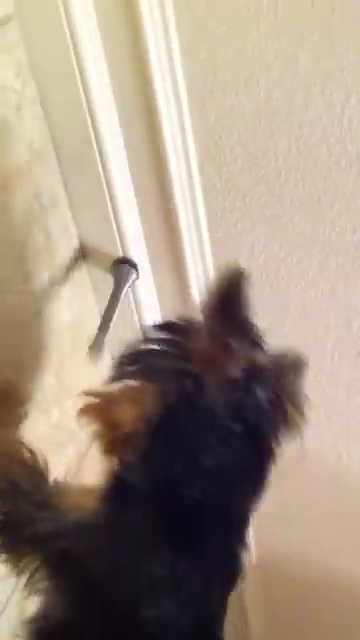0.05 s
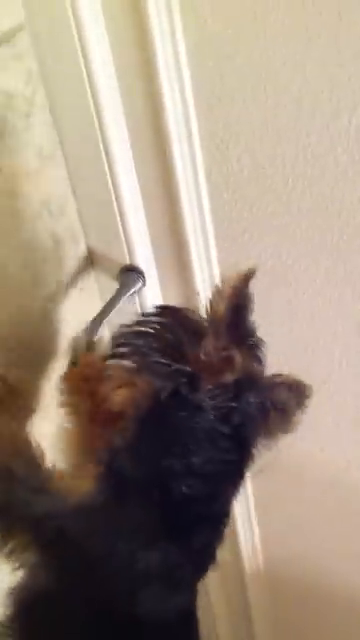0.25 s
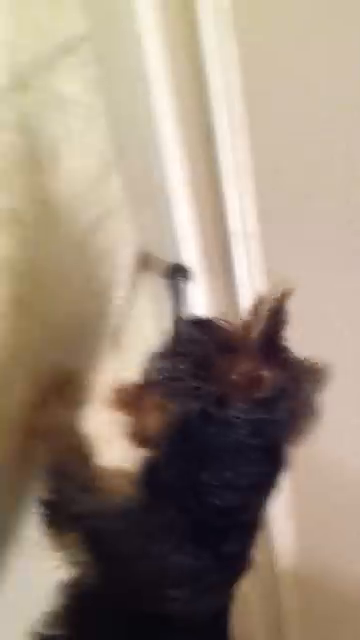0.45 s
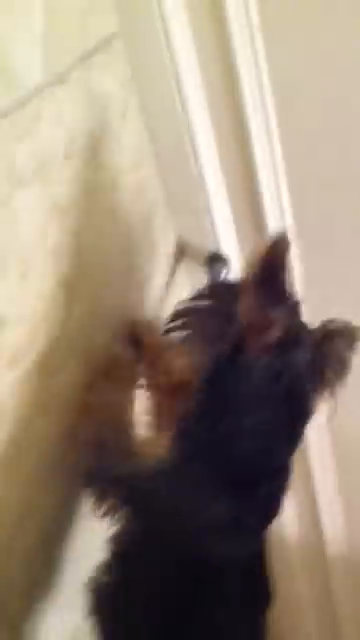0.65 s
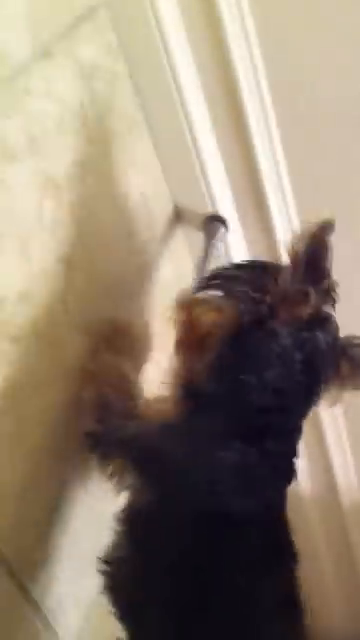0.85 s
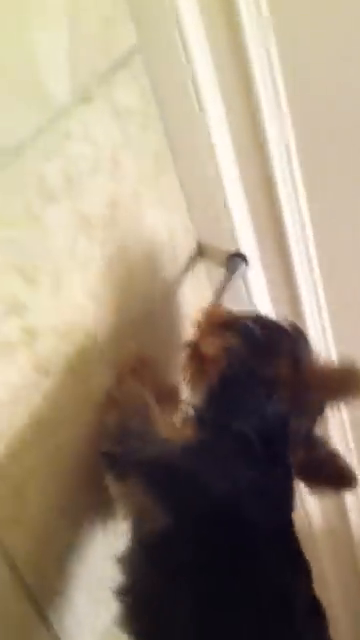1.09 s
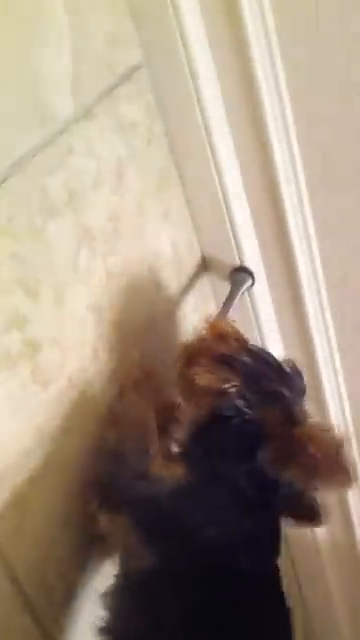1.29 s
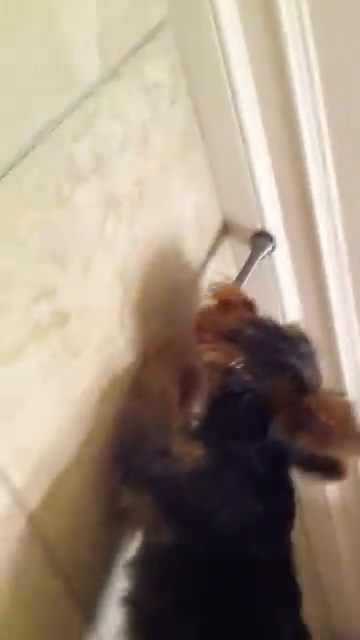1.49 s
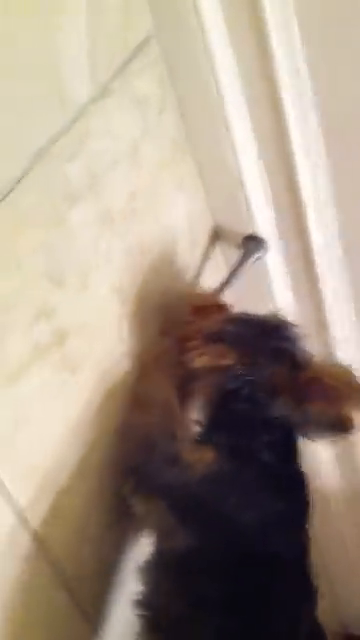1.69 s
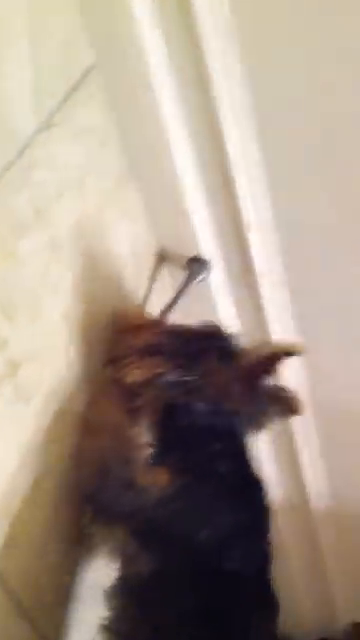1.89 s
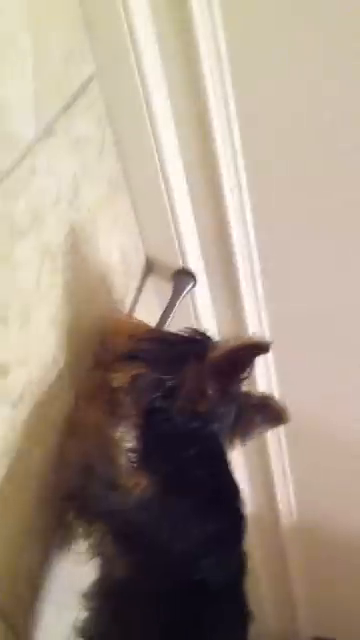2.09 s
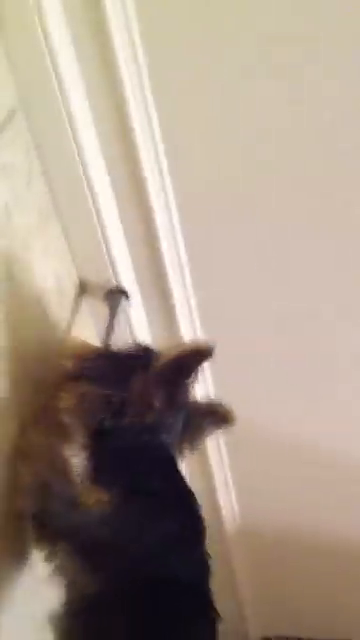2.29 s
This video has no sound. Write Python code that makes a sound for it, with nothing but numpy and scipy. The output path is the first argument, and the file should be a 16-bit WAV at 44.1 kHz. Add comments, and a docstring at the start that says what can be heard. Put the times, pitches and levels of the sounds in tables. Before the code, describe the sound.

Sharp, rattling knocks of a doorstop rod batted by a puppy, then faint taps on tile.

```python
"""A puppy knocks a metal rod doorstop about at the foot of a wall, in a small tiled room.
Each impact drives a damped thud from the baseboard and a brief clash from the loose rod;
reflections follow, and the wall and room ring on. Fur brushes the wall between the knocks
and as they die away. Last come a few soft, nearly dry taps close by, with tiny ticks and
a dull shuffle of paws, over a faint steady background noise."""
import sys
import numpy as np
from scipy import signal
from scipy.fft import rfft, irfft
from scipy.io import wavfile

SR = 44100
rng = np.random.default_rng(int(sys.argv[2]) if len(sys.argv) > 2 else 0)


def unload_wav(signal):
    """Save mono or channel-first audio to the path in sys.argv[1] as 16-bit WAV at rate SR, clipped to [-1, 1]."""
    wavfile.write(
        sys.argv[1],
        SR,
        np.round(np.clip(np.atleast_2d(signal).T, -1, 1) * 32767).astype(np.int16),
    )


N = 108045

# Knocks of the doorstop. Each row: start in seconds, relative thud level in dB, thud pitch in Hz,
# relative clash level in dB, clash tilt in dB per octave.
KNOCKS = [(.051, -45, 890, -33, -8.5), (.083, -63, 900, -29, -0.5), (0.103, -16.5, 920, -51, -3),
          (0.1172, -21.5, 640, -22, 1.5), (.153, -57, 900, -26.5, -2.5), (0.174, -50, 900, -36.5, 0),
          (0.216, -51, 1000, -27, -2), (0.2365, -4, 1296, -7, 1), (0.2702, -4, 1110, 0.5, 0.5),
          (0.2774, -2, 1040, -9.5, 6), (.4258, -17, 694, -8.5, 2), (.466, 0.5, 1100, -0.5, 1),
          (0.4887, -14, 930, -7, -3.5), (.7088, 0.5, 1364, -5, -1.5), (.947, -37, 870, -33, -8.5),
          (.956, -26, 880, -26.5, -6), (0.9613, -37, 794, -16.5, -3), (0.9889, -4.5, 925, -5, 2.5),
          (1.243, -34, 720, -23.5, -3), (1.2612, -26, 1100, -11, 1), (1.266, -16.5, 557, -50, -8),
          (1.337, -28.5, 395, -27.5, -4.5)]


def baseboard():
    """Heavily damped oscillation: a thud that dies in a cycle or so, and the wall's low push under it."""
    # Spectrum of the thud. Each row: frequency in Hz, gain in dB.
    thud_spectrum = [(40, -30), (120, -19), (250, 1), (500, -1.5), (1000, -1.5), (1600, 2), (2500, 3.5),
                     (5000, -21.5), (16000, -20)]
    decay_cycles, rise_s = 0.53, 0.00037
    push_db, push_peak_s = -26, 0.0019
    t = np.arange(4096) / SR
    thuds, pushes = np.zeros((2, N))
    for start, db, hz, _, _ in KNOCKS:
        envelope = np.exp(-t * hz / decay_cycles) * (1 - np.exp(-t / rise_s))
        add(thuds, start, amp(db) * unit(envelope * np.sin(2 * np.pi * hz * t)))
        push = np.gradient(swell(t, push_peak_s, sharp=4.9))
        add(pushes, start, amp(db + push_db) * unit(push))
    return colour(thuds, thud_spectrum), pushes


def rod():
    """Modal excitation: chatter in its seat rings the rod. Gives the direct clash and the room's share."""
    # Spectrum of the chatter. Each row: frequency in Hz, relative level in dB.
    clash_spectrum = [(100, -20.5), (700, 3.5), (2000, -2.5), (3500, 0), (5400, 1.5), (6600, -2.5),
                      (8600, -6.5), (12000, -6.5), (16000, -5)]
    # Modes of the rod. Each row: frequency in Hz, relative level in dB, 60 dB decay time in seconds.
    rod_modes = [(2800, 4, 0.043), (3515, -7.5, 0.053), (4260, 1.5, 0.016), (4835, -6, 0.022),
                 (5560, 5, 0.024), (6200, 1, 0.047), (7630, -1.5, 0.031), (9500, 0, .012),
                 (11900, 7, 0.0071), (15600, -8, 0.0078)]
    peak_s, grain_db = 0.0017, 2
    ring_db, vary_db, detune = -7.5, 0.5, 0.0275
    t = np.arange(4096) / SR
    clashes, pulses = np.zeros((2, N))
    for start, _, _, db, tilt_db in KNOCKS:
        contacts, sizes = rng.standard_normal((2, len(t)))
        force = contacts * amp(grain_db * sizes) * swell(t, peak_s, sharp=1.2)
        chatter = colour(force, clash_spectrum, tilt_db)
        # Each knock excites and loads the rod differently.
        modes = [(hz * (1 + detune * rng.normal()), mode_db + vary_db * rng.normal(), t60)
                 for hz, mode_db, t60 in rod_modes]
        ringing = through(chatter, ring(modes, size=len(t)))
        add(clashes, start, amp(db) * (unit(chatter) + amp(ring_db) * unit(ringing)))
        # Summed over all directions, the clash is partly a pulse with a smooth spectrum.
        pulse = colour(signal.unit_impulse(len(t)), clash_spectrum, tilt_db)
        add(pulses, start + peak_s, amp(db) * unit(pulse))
    return clashes, amp(-1.5) * pulses + amp(-4.5) * clashes


def echoes(x):
    """Specular reflection: the floor and nearest walls return delayed, weaker copies."""
    # Early reflections. Each row: delay in seconds, gain as a ratio.
    reflections = [(.0021, 0.33), (.0052, 0.56), (0.0146, 0.12), (.0192, 0.19), (0.0264, 0.14)]
    out = np.zeros(N)
    for delay_s, gain in reflections:
        add(out, delay_s, gain * x)
    return out


def wall(x):
    """Resonance: the wall, door and room ring on at their natural frequencies."""
    # Their modes. Each row: frequency in Hz, relative level in dB, 60 dB decay time in seconds.
    wall_modes = [(378, 9, 0.7), (388.5, 5, 0.47), (517, -9.5, 0.4), (550, -22, 0.78), (627, -3.5, 0.22),
                  (756, -13, 0.57), (865, 0.5, 0.62), (876, 2, 0.4), (1070, -12.5, 0.84), (1159, 7, 0.093),
                  (1254, 5, 0.13), (1319, 5.5, 0.093), (1390, -1.5, 0.17), (1499, -5.5, 0.21)]
    return through(x, amp(-26) * ring(wall_modes))


def reverberation(x, count=3):
    """A diffuse field differs from place to place: tails crossfade as the listener moves."""
    cycle_s = 0.72
    turn = np.arange(N) / SR / cycle_s - np.arange(count)[:, None] / count
    shares = np.maximum(np.cos(2 * np.pi * turn), 0)
    shares /= np.linalg.norm(shares, axis=0)  # constant total power
    return amp(-1) * sum(through(x * share, tail()) for share in shares)


def tail():
    """Absorption: dense reflections build up, then each band decays at its own rate."""
    # Reverberation times. Each row: frequency in Hz, 60 dB decay time in seconds.
    decay_times = [(100, 0.63), (400, 0.41), (1000, 0.38), (2800, 0.34), (7000, .38), (15000, 0.1937)]
    # Spectrum of the tail. Each row: frequency in Hz, gain in dB.
    tail_spectrum = [(40, -19.5), (150, -9.5), (400, 5), (1000, 0), (3000, 1), (6000, -2.5), (10000, -2),
                     (16000, -2.5)]
    build_s = 0.0068
    t = np.arange(SR) / SR
    hz, frame_s, bands = signal.stft(rng.standard_normal(SR), SR, nperseg=256)
    decay = np.exp(-np.log(1000) * frame_s / read(decay_times, hz)[:, None])
    wash = signal.istft(bands * decay, SR, nperseg=256)[1][:SR]
    return colour(unit(wash * (1 - np.exp(-t / build_s))), tail_spectrum)


def taps():
    """Soft impacts: each is a tone that glides down as it swells, with scuffing in the same envelope."""
    # Soft taps. Each row: start in seconds, level in dB, first and final pitch in Hz,
    # rise time in seconds, scuffing level against the tone in dB.
    soft_taps = [(1.7882, -55.5, 1120, 580, 0.0018, 4.5), (1.7927, -37, 392, 218, 0.0039, -19),
                 (1.817, -45, 217, 175, 0.0036, -27), (2.15, -51.5, 1950, 910, 0.0019, 3.5),
                 (2.1529, -46.5, 814, 392, 0.0069, -2), (2.1581, -40, 575, 164, 0.0029, -23),
                 (2.182, -52.5, 228, 186, .008, -15), (2.394, -54, 640, 372, 0.0097, -4.5),
                 (2.411, -63.5, 820, 306, 0.0068, 1.5), (2.425, -54, 480, 282, 0.0043, -15),
                 (2.437, -52, 190, 165, 0.0068, -34)]
    # Spectrum of the scuffing. Each row: frequency in Hz, relative level in dB.
    scuff_spectrum = [(30, -32), (170, 10), (400, 12), (900, 3.5), (1500, -10), (2400, -14), (3300, -27.5),
                      (16000, -33)]
    glide_s = 0.0037
    t = np.arange(4096) / SR
    tones, scuff_envelope = np.zeros((2, N))
    for start, db, first_hz, final_hz, rise_s, scuff_db in soft_taps:
        hz = final_hz + (first_hz - final_hz) * np.exp(-t / glide_s)
        envelope = amp(db) * swell(t, rise_s, sharp=1.3)
        add(tones, start, envelope * np.sin(2 * np.pi * np.cumsum(hz) / SR))
        add(scuff_envelope, start, envelope * amp(scuff_db))
    return tones + scuff_envelope * noise(scuff_spectrum)


def ticks():
    """Broadband transients: bright clicks of noise that decay at once, with no ring."""
    # Dry ticks. Each row: start in seconds, level in dB.
    clicks = [(1.7979, -50.5), (2.1512, -56), (2.154, -47), (2.25, -63), (2.3634, -50)]
    # Spectrum of a tick. Each row: frequency in Hz, relative level in dB.
    tick_spectrum = [(100, -22), (1500, -0.5), (3500, -4), (5800, 5.5), (9000, -10), (16000, -8)]
    decay_s = 0.00074
    t, envelope = np.arange(SR // 50) / SR, np.zeros(N)
    for start, db in clicks:
        add(envelope, start, amp(db) * np.exp(-t / decay_s))
    return envelope * noise(tick_spectrum)


def fur():
    """Friction noise: a soft hiss fades in and out as fur slides along the wall."""
    # Brushes. Each row: start and length in seconds, level before fading in dB, tilt in dB per octave.
    brushes = [(-.06, 0.21, -58.5, -1.5), (0.684, 0.23, -51.5, 7.5), (1.245, 0.46, -58.5, 0.5),
               (1.902, 0.28, -65.5, -2.5)]
    # Spectrum of the hiss. Each row: frequency in Hz, relative level in dB.
    fur_spectrum = [(100, -43), (400, -5), (900, -7), (2500, -2.5), (4000, -1.5), (5300, 2), (7500, -6.5),
                    (12000, -5.5), (16000, -13)]
    fade_s = 0.17
    t, out = np.arange(N) / SR, np.zeros(N)
    for start, length, db, tilt_db in brushes:
        hiss = unit(colour(rng.standard_normal(N), fur_spectrum, tilt_db)) * np.sqrt(N)
        fade = np.clip(np.minimum(t - start, start + length - t) / fade_s, 0, 1)
        out += amp(db) * fade * hiss
    return out


def paws():
    """Friction noise: paws rub the tiles in short, dull swells."""
    # Shuffles. Each row: start in seconds, level in dB, rise time in seconds.
    shuffles = [(0.104, -51, 0.011), (1.656, -69, 0.02), (2.381, -56.5, 0.038)]
    # Spectrum of the rubbing. Each row: frequency in Hz, relative level in dB.
    rub_spectrum = [(30, -23), (120, -11.5), (350, 6), (700, -14.5), (1300, -8.5), (2500, -23),
                    (16000, -32)]
    t, envelope = np.arange(SR // 4) / SR, np.zeros(N)
    for start, db, rise_s in shuffles:
        add(envelope, start, amp(db) * swell(t, rise_s, sharp=1.3))
    return envelope * noise(rub_spectrum)


def background():
    """Stationary noise: a faint hush, strongest in the bass."""
    # Spectrum of the hush. Each row: frequency in Hz, relative spectral density in dB.
    hush_spectrum = [(20, -27), (50, -32), (80, -12), (150, -4), (270, -7.5), (750, -13.5), (1560, -15.5),
                     (3000, -16), (6400, -18), (7700, -20.5), (16000, -21.5)]
    return amp(-66.5) * noise(hush_spectrum)


def amp(db):
    """Decibels to amplitude ratio."""
    return 10 ** (np.asarray(db) / 20)


def read(points, hz):
    """Interpolation of a curve at hz, on a logarithmic frequency axis."""
    f, value = np.transpose(points)
    return np.interp(np.log(hz + 1), np.log(f + 1), value)


def unit(x):
    """Normalisation to an energy of one."""
    return x / np.sqrt(np.sum(x ** 2) + 1e-20)


def add(mix, start_s, sound):
    """Superposition of a sound on the mix from start_s."""
    part = mix[max(round(start_s * SR), 0):][:len(sound)]
    part += sound[:len(part)]


def through(x, response):
    """Convolution, cut to the length of x."""
    return signal.fftconvolve(x, response)[:len(x)]


def colour(x, points, tilt_db=0, size=2048):
    """Minimum-phase filtering; above 1 kHz the spectrum tilts by tilt_db per octave about 5 kHz."""
    hz = abs(np.fft.fftfreq(size, 1 / SR))
    octaves = np.log2(np.maximum(hz, 1000) / 5000)
    log_gain = np.log(amp(read(points, hz) + tilt_db * octaves))
    spectrum = np.exp(np.conj(signal.hilbert(log_gain)))
    return through(x, np.fft.ifft(spectrum).real)


def noise(points):
    """Spectral shaping of white noise, at an rms of one."""
    gain = amp(read(points, np.fft.rfftfreq(N, 1 / SR)))
    return unit(irfft(rfft(rng.standard_normal(N)) * gain, N)) * np.sqrt(N)


def ring(modes, size=32768):
    """Impulse response as a sum of damped modes; the levels set each mode's energy."""
    t = np.arange(size) / SR
    return sum(amp(db) * unit(np.sin(2 * np.pi * hz * t) * np.exp(-np.log(1000) * t / t60))
               for hz, db, t60 in modes)


def swell(t, peak_s, sharp):
    """Gamma envelope: a smooth rise to one at peak_s and a slower fall."""
    return (t / peak_s * np.exp(1 - t / peak_s)) ** sharp


def scene():
    """Direct and reverberant fields add: the knocks fill the room, the close taps stay almost dry."""
    thuds, pushes = baseboard()
    clashes, radiated_clashes = rod()
    close_taps = taps()
    knocks = thuds + pushes + clashes
    into_room = thuds + radiated_clashes + amp(-28.5) * close_taps
    room = echoes(knocks) + wall(into_room) + reverberation(into_room)
    return (amp(-4) * (knocks + room) + close_taps + ticks() + fur() + paws() + background())[None]


def record(dry):
    """Band limiting: a linear-phase low-pass filter removes the highest treble."""
    edge_hz = 15950
    lowpass = signal.firwin(401, edge_hz, window=("kaiser", 8), fs=SR)
    return signal.oaconvolve(dry, lowpass[None], "same")


dry = scene()
out = record(dry)
unload_wav(out)
```